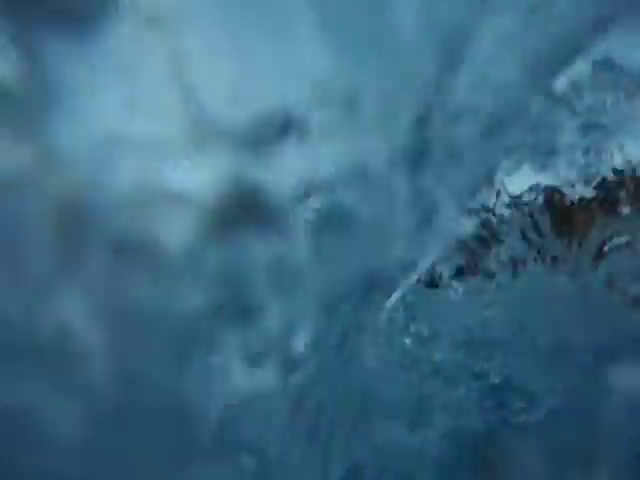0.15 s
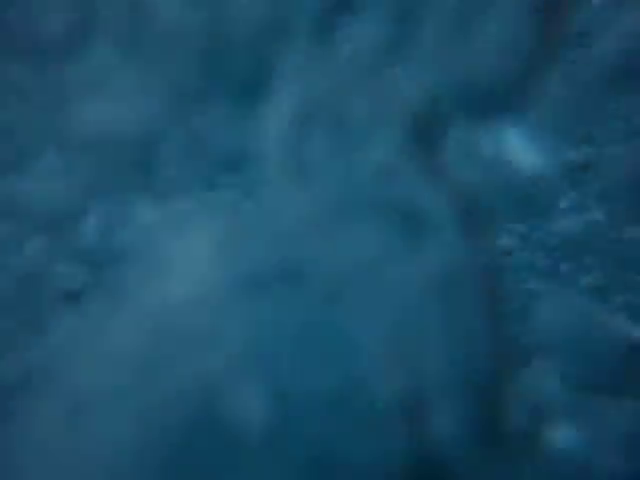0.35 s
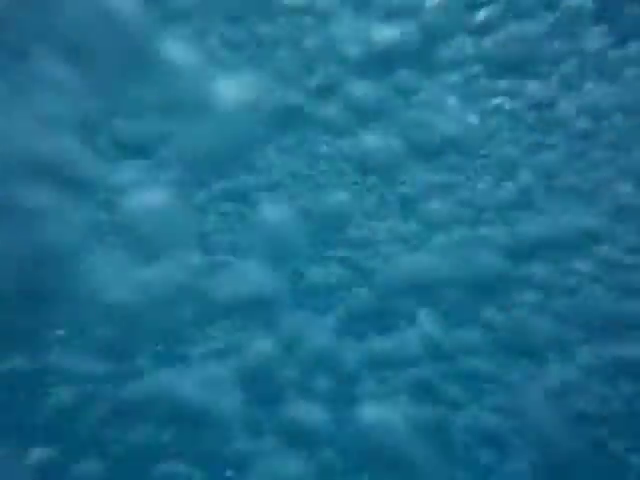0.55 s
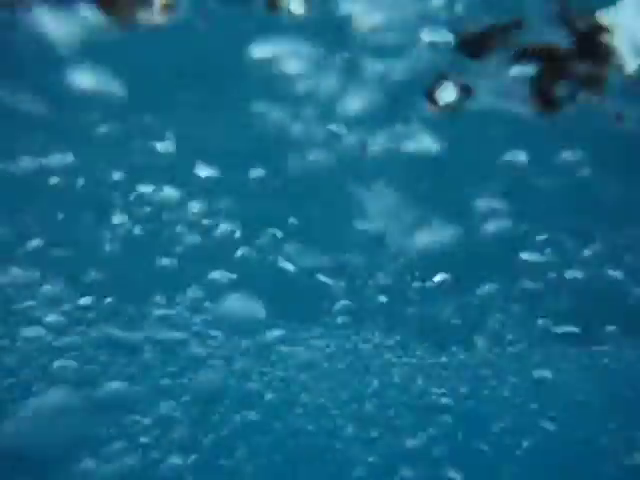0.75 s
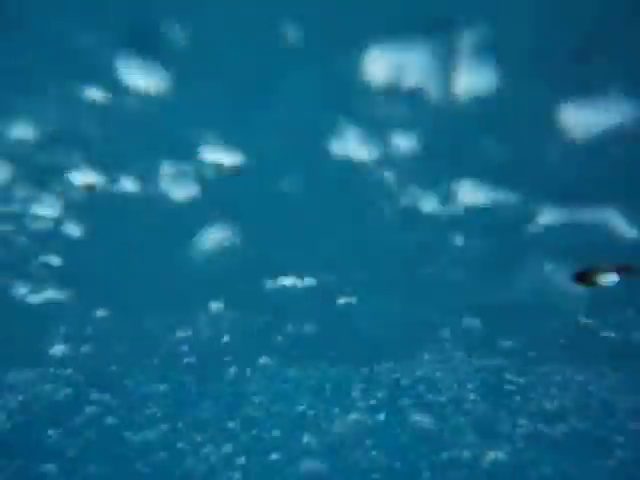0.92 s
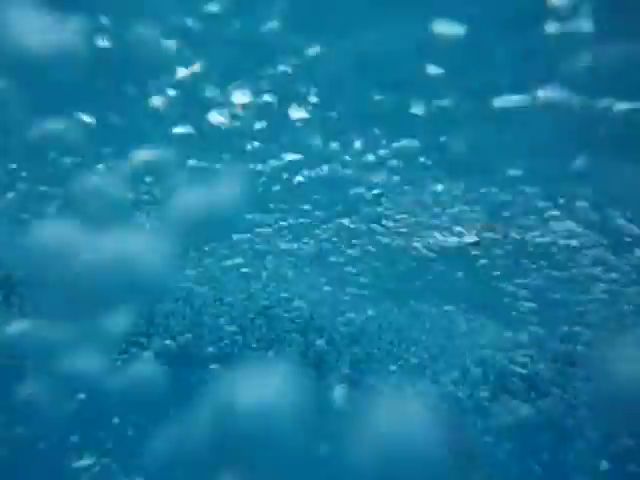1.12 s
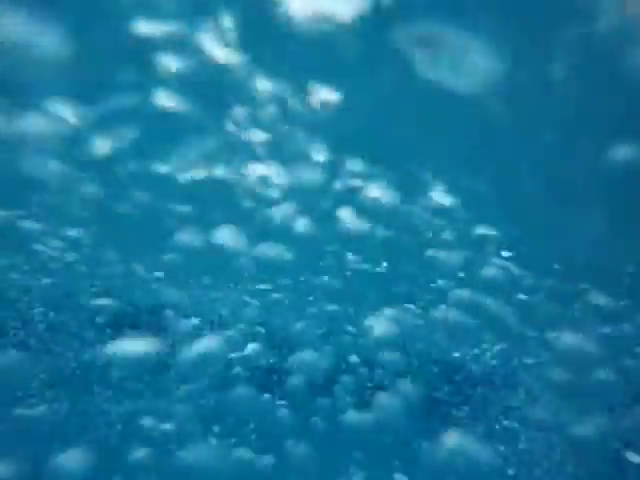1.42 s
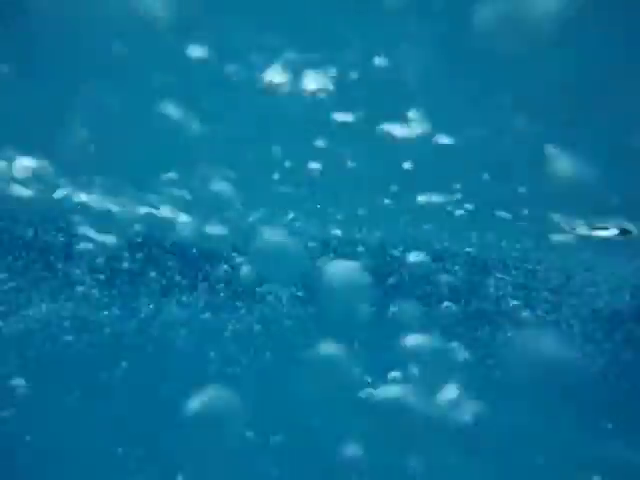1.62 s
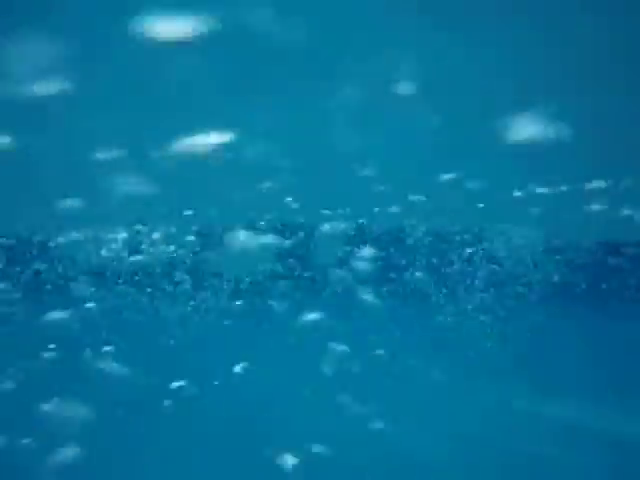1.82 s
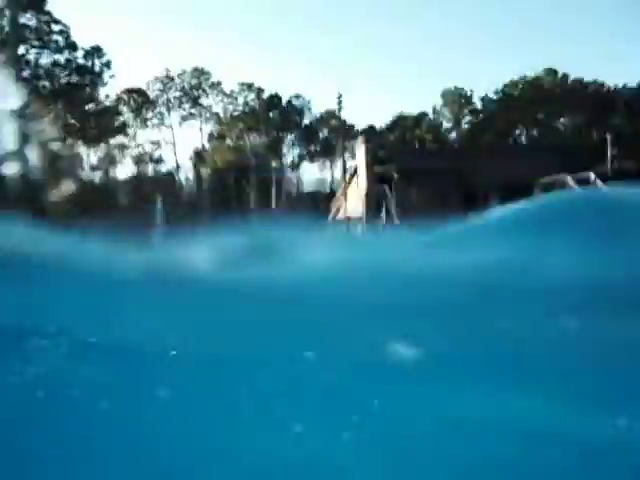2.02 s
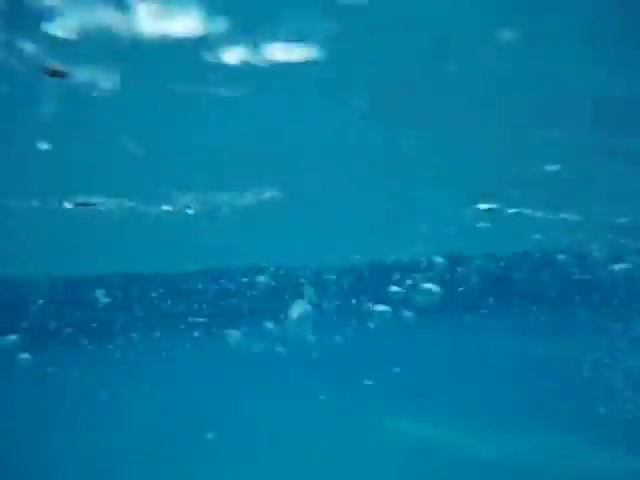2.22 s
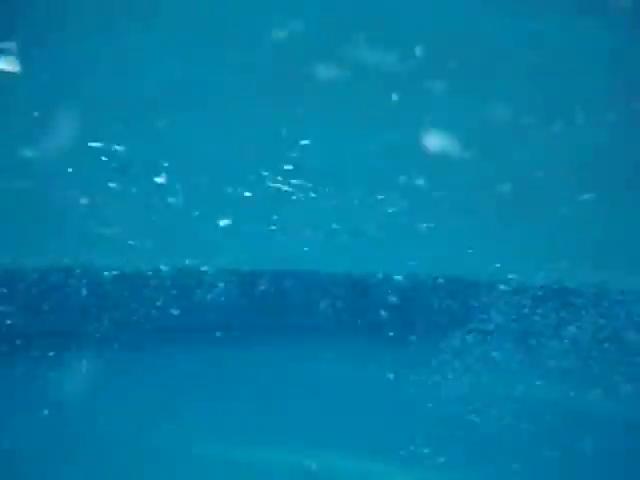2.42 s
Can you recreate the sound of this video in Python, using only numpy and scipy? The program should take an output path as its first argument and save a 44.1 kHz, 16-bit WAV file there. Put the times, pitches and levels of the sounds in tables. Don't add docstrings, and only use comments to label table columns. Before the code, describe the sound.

A splash into a pool, heard by a cased microphone. Low water buffeting until 0.2 s, then a violent, overloaded slam with crackling spray to about 0.4 s. Underwater it turns dull and quieter: low gulping hum rising in pitch, faint fizz, soft bumps and pops around 1.3 s. From 2.0 s bubbles plop louder, with sharp knocks near 2.25 s and a short bubbling flutter at 2.5 s.

```python
import sys
import numpy as np
from scipy import signal
from scipy.fft import rfft, irfft
from scipy.io import wavfile

SR = 44100
rng = np.random.default_rng(int(sys.argv[2]) if len(sys.argv) > 2 else 0)


def dump(signal):
    limited = np.clip(np.atleast_2d(signal).T, -1, 1)
    pcm = np.round(limited * 32767).astype(np.int16)
    wavfile.write(sys.argv[1], SR, pcm)


def attenuation_scalar(level_db):
    decades = np.asarray(level_db, float) / 20
    return 10 ** decades


N = 112454


def in_time(rows):
    s, *columns = np.transpose(rows)
    return [np.interp(np.arange(N) / SR, s, c) for c in columns]


def rms_one(x):
    return x / np.sqrt(np.mean(x ** 2) + 1e-20)


def drift(rate_hz):
    r = np.exp(-2 * np.pi * rate_hz / SR)
    settle = 9000
    noise = rng.standard_normal(N + settle)
    return rms_one(signal.lfilter([1], [1, -2 * r, r * r], noise)[settle:])


def coloured(points):
    hz = np.maximum(np.arange(N // 2 + 1) * SR / N, 1)
    p = np.array(points)
    db = np.interp(np.log(hz), np.log(p[:, 0]), p[:, 1], left=-40, right=-70)
    return rms_one(irfft(rfft(rng.standard_normal(N)) * attenuation_scalar(db), N))


def ring(clicks, hz, t60):
    r, w = attenuation_scalar(-60 / (t60 * SR)), 2 * np.pi * hz / SR
    return signal.lfilter([0, np.sin(w)], [1, -2 * r * np.cos(w), r * r], clicks + 1e-18)


def grains(per_s, low_hz, high_hz, cycles, spread_db):
    sizes = attenuation_scalar(spread_db * np.minimum(rng.exponential(1, N), 4)) * rng.choice([-1, 1], N)
    born = rng.random(N) < per_s / SR
    pitch = rng.integers(0, 16, N)
    out = 0
    for k, hz in enumerate(np.geomspace(low_hz, high_hz, 16)):
        out = out + ring(sizes * born * (pitch == k), hz, cycles / hz)
    return rms_one(out)


def bubbles(rows, rise_per_t60=0.072, crack_db=-22.5):
    roughness, rough_width = 0.69, 0.28
    out, t = np.zeros(N + SR), np.arange(SR // 8) / SR
    for s, db, hz, t60 in rows:
        noise = rng.standard_normal((2, len(t)))
        turn = 2 * np.pi * hz * (t + rise_per_t60 * t * t / t60)
        r = np.exp(-2 * np.pi * hz * rough_width / SR)
        a, b = signal.lfilter([2 * (1 - r) ** 1.5], [1, -2 * r, r * r], noise)
        decay = attenuation_scalar(-60 * t / t60)
        ruffle = roughness * decay
        tone = (1 + ruffle * a) * np.sin(turn) + ruffle * b * np.cos(turn)
        onset = 1 - np.exp(-t * hz * 4.9)
        crack = attenuation_scalar(crack_db - 60 * t / 0.0019) * noise[0]
        start = int(s * SR)
        out[start:start + len(t)] += attenuation_scalar(min(db, -2.5)) * (tone * decay * onset + crack)
    return out[:N]


def pushes(rows, bluntness):
    t = np.arange(N) / SR
    return sum(h * np.exp(-np.abs((t - s) / w) ** bluntness) for s, h, w in rows)


def surges():
    # (time [s], signed height, half length [s])
    surge_rows = [(.215, -.45, .005), (.23, .3, .0045), (.244, .45, .002), (.2485, -1.6, .0017),
                  (.2515, .25, .001), (.2605, -2.3, .0039), (.2688, 1.5, .0052), (.275, -1.3, .0012),
                  (.281, 1.2, .0048), (.2875, .2, .0015), (.2918, .85, .003), (.301, -.68, .004),
                  (.308, -.65, .002), (.314, -.75, .0028), (.319, .5, .0018), (.322, -.8, .0011),
                  (.325, .8, .0017), (.3282, .35, .002), (.3325, .75, .003), (.343, -.52, .005),
                  (.352, -.72, .0015), (.356, -.4, .002), (1.276, .13, .0085), (1.315, -.1, .0093),
                  (1.39, -.1, .005)]
    return pushes(surge_rows, 3.5)


def crushed_pockets():
    # (time [s], peak level [dB], pitch [Hz], t60 [s])
    pocket_rows = [(.2185, 0, 1170, .015), (.2245, 2, 3920, 0.018), (.2285, -9.5, 4080, 0.018),
                   (.2325, -9, 3100, .015), (.2395, -7, 1230, 0.014), (.2535, -12, 4480, 0.014),
                   (.2765, -7, 2980, 0.0086), (.3012, -10, 2610, 0.01), (1.648, -34, 990, 0.16),
                   (1.692, -35, 1340, 0.037), (1.785, -32.5, 1250, 0.053), (2.04, -32.5, 1590, .02),
                   (2.355, -31, 3200, .015), (2.3245, -20, 1680, .015)]
    return bubbles(pocket_rows)


def spray():
    # (time [s], level [dB])
    spray_level = [
        (0, -40.5),
        (.13, -35.5),
        (.205, -30.5),
        (.214, -14.5),
        (.2355, -11.5),
        (.27, -21),
        (.36, -35),
        (.385, -45),
        (.43, -44.5),
    ]
    # (frequency [Hz], level [dB])
    spray_colour = [(300, -10), (900, -11.5), (1600, 0.5), (3000, 0.5), (4000, 0.5), (5500, -7),
                    (7000, -33.5)]
    db, = in_time(list(spray_level) + [(.55, -96.5)])
    crackle = grains(1400, 700, 5000, 9.0, 4.0)
    return attenuation_scalar(db + 2.58 * drift(68) - 1.0) * (1.034 * coloured(spray_colour) + 0.41 * crackle)


def buffet():
    # (time [s], level [dB])
    buffet_level = [(0, -26), (.07, -36), (.12, -28.5), (.2, -25.5), (.24, -39.5), (.38, -20.5), (.45, -42),
                    (.7, -34.5), (.9, -50.5), (1.1, -46.5), (1.22, -36), (1.29, -40.5), (1.5, -40.5),
                    (1.75, -42), (1.98, -32.5), (2.1, -33), (2.4, -37.5), (2.55, -40)]
    # (frequency [Hz], level [dB per Hz])
    buffet_colour = [(7.1, -53), (12, 8), (56, -7), (152, -15.5), (239, -12.5), (400, -25.5), (520, -37),
                     (880, -120)]
    return attenuation_scalar(in_time(buffet_level)[0] + 4.3 * drift(63) + 0.5) * coloured(buffet_colour)


def slaps():
    # (time [s], level [dB], width [s])
    slap_rows = [(0.367, -1, 0.0023), (.41, -9.5, 0.0011), (0.5, -20, 0.0088), (0.681, -19, 0.0023),
                 (0.929, -23, 0.0031), (1.073, -21.5, 0.0029), (1.269, -12, 0.0048), (1.337, -12.5, 0.0033),
                 (2.2522, -8.5, 0.00056), (2.2619, -7, 0.00077), (2.2775, -2.5, 0.00088)]
    t = np.arange(N) / SR
    out = 0
    for s, db, w in slap_rows:
        dip = np.exp(-np.abs(t - s) / w)
        rebound = 0.24 * np.exp(-((t - s - 2.6 * w) / (5.8 * w)) ** 2)
        out = out + attenuation_scalar(db) * (rebound - dip)
    return out


def sloshes():
    # (time [s], signed height, half length [s])
    slosh_rows = [(.011, -0.11, 0.0023), (.029, -0.097, 0.0022), (.036, 0.15, 0.0039),
                  (.106, 0.067, 0.0034), (.116, -0.16, 0.0057), (.158, 0.14, 0.0013), (.194, -0.25, 0.0027),
                  (.2, -0.17, 0.0016), (.208, 0.29, 0.00091), (.381, 0.13, 0.004), (.43, 0.097, 0.013),
                  (.8, -0.033, 0.026), (1.03, -0.033, 0.0057), (1.098, -0.058, 0.003),
                  (1.155, -0.042, 0.0029), (1.183, 0.035, 0.0071), (1.5, 0.089, .004),
                  (1.517, -0.041, 0.016), (1.552, .06, 0.017), (1.74, 0.04, 0.028), (1.933, 0.07, 0.0054),
                  (1.97, -.045, 0.0082), (2.47, .025, 0.0084)]
    return pushes(slosh_rows, 1.7)


def plops():
    # (time [s], peak level [dB], pitch [Hz], t60 [s])
    plop_rows = [(0.378, -19.5, 630, 0.038), (0.543, -22.5, 1180, 0.013), (0.681, -33, 920, 0.02),
                 (0.83, -34, 790, 0.013), (0.934, -41, 790, 0.018), (1.025, -38, 1130, 0.025),
                 (1.07, -32, 1080, 0.019), (1.151, -32.5, 910, 0.024), (1.268, -27.5, 950, 0.026),
                 (1.338, -26.5, 1037, 0.035), (1.444, -26.5, 780, 0.042), (1.462, -27.5, 800, 0.035),
                 (1.622, -24.5, 998, 0.063), (1.684, -27.5, 925, 0.086), (1.782, -20, 960, 0.013),
                 (1.892, -26.5, 1105, 0.043), (1.989, -13, 770, 0.022), (2.021, -18.5, 563, 0.037),
                 (2.034, -16, 930, 0.026), (2.062, -15, 1650, 0.026), (2.075, -14, 1600, 0.025),
                 (2.206, -19.5, 1590, 0.02), (2.223, -13, 1050, 0.0077), (2.2525, 5, 1156, 0.024),
                 (2.2972, -5.5, 1255, 0.016), (2.303, -11.5, 1175, 0.024), (2.342, -11.5, 1144, 0.0081),
                 (2.395, -16, 1287, 0.018), (2.432, -32.5, 1270, 0.028), (2.487, -28.5, 1163, 0.057)]
    return bubbles(plop_rows)


def small_bubbles():
    # (time [s], peak level [dB], pitch [Hz])
    tink_rows = [(0.1461, -15, 4230), (0.163, -9.5, 3550), (0.31, -15.5, 2120), (0.3398, -9, 4370),
                 (0.3572, -5.5, 3880), (0.4671, -21.5, 2750), (0.6654, -34.5, 3230), (0.7425, -31.5, 3410),
                 (0.9343, -36, 4500), (1.1447, -32.5, 2320), (1.1702, -35, 4380), (1.2655, -30.5, 4120),
                 (1.3027, -29, 2360), (1.3285, -30, 2430), (1.367, -25.5, 2630), (1.4021, -22, 2300),
                 (1.4085, -22.5, 4500), (1.8252, -33.5, 4000), (2.0367, -23, 1890), (2.061, -20, 2410),
                 (2.0745, -19.5, 4340), (2.1039, -23, 2510), (2.1214, -22.5, 3480), (2.1499, -33, 2210),
                 (2.2968, -10, 2600), (2.3243, -18, 2700), (2.3417, -17, 2350), (2.3748, -27.5, 2170),
                 (2.396, -20.5, 2660)]
    # (time [s], peak level [dB],
    # pitch [Hz])
    crackle_rows = [(2.253, -9.5, 1770), (0.403, -27, 4600), (0.548, -32, 1780), (1.277, -37, 4700),
                    (1.336, -33.5, 4700), (1.351, -35, 3030), (1.366, -20.5, 4260), (1.419, -32.5, 2290),
                    (2.223, -32.5, 1800), (2.375, -29, 4930), (2.432, -28.5, 2920), (0.366, -19, 4700)]
    t60_cycles = 37.7
    return bubbles([(s, db, hz, t60_cycles / hz) for s, db, hz in list(tink_rows) + list(crackle_rows)])


def gulps():
    # (time [s], peak level [dB], pitch [Hz], t60 [s])
    gulp_rows = [(.493, -31.5, 243.6, 0.13), (.553, -35, 252, 0.18), (.612, -27.5, 270, 0.22),
                 (.64, -26, 283, 0.13), (.728, -25.5, 254.7, 0.12), (.885, -36.5, 305, 0.19),
                 (1.03, -34, 420, 0.085), (1.828, -35.5, 531, 0.11), (1.932, -34, 556, 0.14),
                 (2.103, -35, 540, .05), (2.12, -32.5, 600, 0.043), (2.152, -26, 787, .04),
                 (2.174, -25.5, 556, .05), (2.19, -29, 990, .04), (2.257, -8.5, 828, 0.02)]
    return bubbles(gulp_rows, crack_db=-40)


def torn_bubble():
    # (time [s], peak level [dB], pitch [Hz], t60 [s])
    torn_rows = [
        (0.396, -18.5, 1500, 0.016),
    ]
    return bubbles(torn_rows, rise_per_t60=1.0)


def cloud():
    # (time [s], pitch [Hz], level [dB])
    cloud_hum = [(0, 226, -50), (.2, 229.4, -51), (.4, 238.4, -36.5), (.6, 254.8, -38.5), (.8, 300, -44),
                 (1.05, 391.4, -54.5), (1.35, 440.7, -48), (1.7, 501, -47), (2.05, 523.5, -44),
                 (2.35, 528.7, -40), (2.45, 520, -57), (2.51, 581.4, -42), (2.55, 554, -54)]
    width_hz = 34
    hz, db = in_time(cloud_hum)
    turn = 2 * np.pi * np.cumsum(hz) / SR
    out = 0
    for ratio, level_db in ((1, 0), (1.75, -7)):
        wide_hz = width_hz * ratio * ratio
        band = drift(wide_hz) * np.cos(ratio * turn) + drift(wide_hz) * np.sin(ratio * turn)
        out = out + attenuation_scalar(level_db + 3.6 * drift(25.0)) * band
    return attenuation_scalar(db) * out


def leak():
    # (time [s], rate [bubbles per s], level [dB])
    leak_train = [
        (2.485, 232, -47),
        (2.5, 237, -29.5),
        (2.512, 202, -27.5),
        (2.527, 196, -25.5),
        (2.55, 163, -39),
    ]
    base_db, pocket_width_hz = -8.5, 117
    rate, db = in_time(leak_train)
    t = np.arange(N) / SR
    turn = 2 * np.pi * np.cumsum(rate * (1 + 0.036 * drift(60))) / SR
    pocket_hz = 460 + 6200 * np.clip(t - 2.508, 0, .02)
    tones = 0
    for k in range(1, 5):
        lift = np.exp(-((k * rate - pocket_hz) / pocket_width_hz) ** 2)
        tones = tones + (attenuation_scalar(base_db) / k + lift) * np.sin(k * turn)
    return attenuation_scalar(db) * (t > leak_train[0][0]) * tones


def fizz():
    # (time [s], level [dB])
    stir_level = [(.19, -54), (.23, -9), (.4, -34.5), (.57, -44.5), (.87, -45), (1.12, -47.5), (1.3, -33.5),
                  (1.46, -38), (1.55, -45.5), (1.9, -47), (2.0, -40.5), (2.18, -32.5), (2.35, -58.5),
                  (2.44, -54.5), (2.55, -48)]
    db, = in_time(stir_level)
    low = grains(450, 560, 1450, 15, 3.3)
    high = grains(90, 1300, 4800, 22.0, 4.0)
    low_gain = attenuation_scalar(-4 + 1.0 * drift(6.7))
    tick_gain = attenuation_scalar(-15 + np.minimum(0.71 * (db + 43.5), 2))
    return attenuation_scalar(db) * (low_gain * low + tick_gain * high)


def noise_floor():
    # (frequency [Hz], level [dB])
    floor_colour = [(350, -31.5), (600, -13.5), (4670, -17), (6000, -21), (7800, -39.5), (13200, -120)]
    return attenuation_scalar(-53 - 2.0) * coloured(floor_colour)


def scene():
    slam = surges() + crushed_pockets() + spray()
    flow = buffet() + slaps() + sloshes()
    single = plops() + small_bubbles() + gulps() + torn_bubble()
    return (slam + flow + single + cloud() + leak() + fizz() + noise_floor())[None]


def roll_off(x):
    return signal.sosfilt(signal.butter(12, 16090, fs=SR, output="sos"), x)


def record(dry):
    overload, late_overload, cutoff_hz = .72, .74, 5375
    steep = signal.cheby1(8, .5, cutoff_hz, fs=SR, output="sos")
    x = signal.sosfilt(steep, np.clip(dry, -overload, overload))
    return roll_off(np.clip(x, -late_overload, late_overload))


dry = scene()
out = record(dry)
dump(out)
```